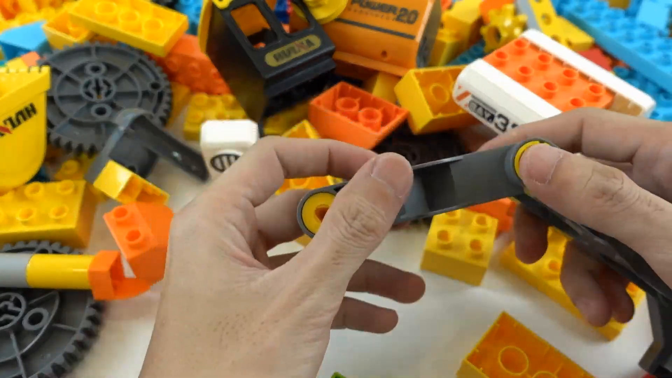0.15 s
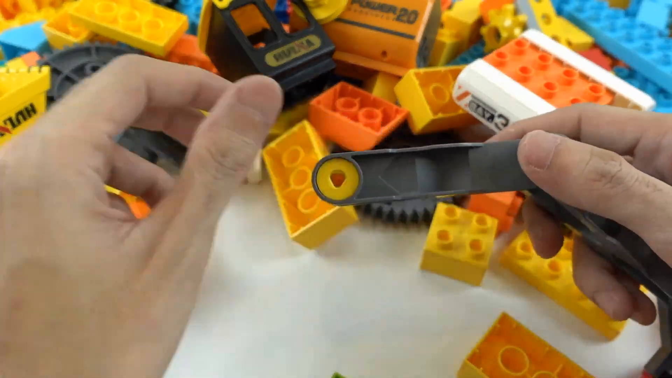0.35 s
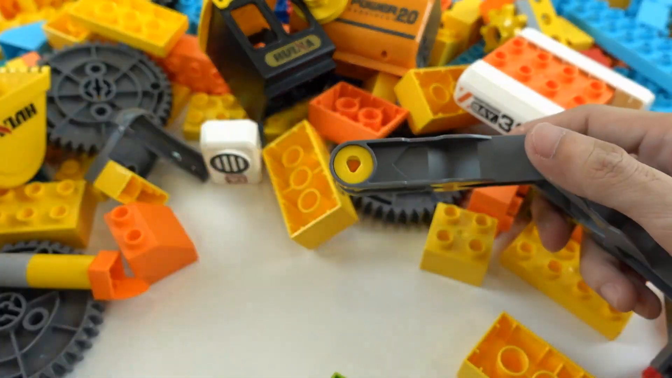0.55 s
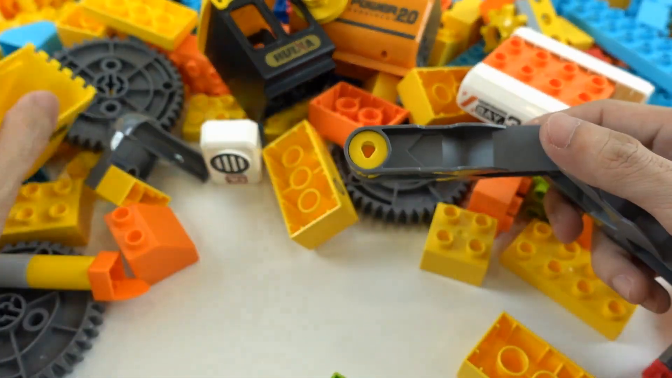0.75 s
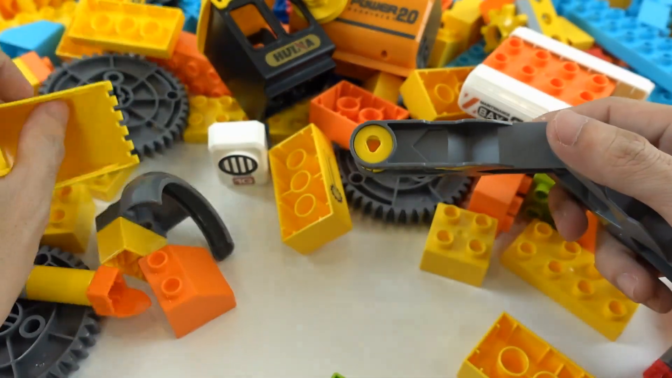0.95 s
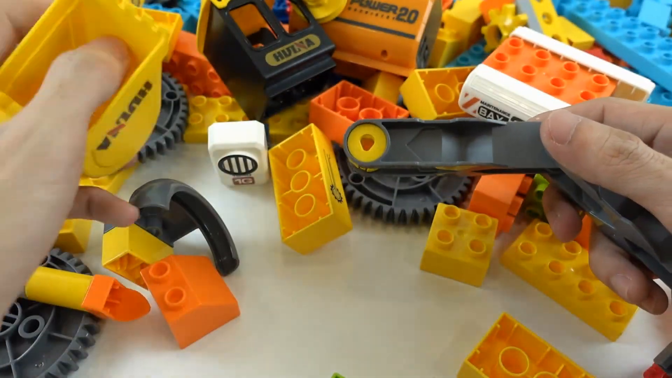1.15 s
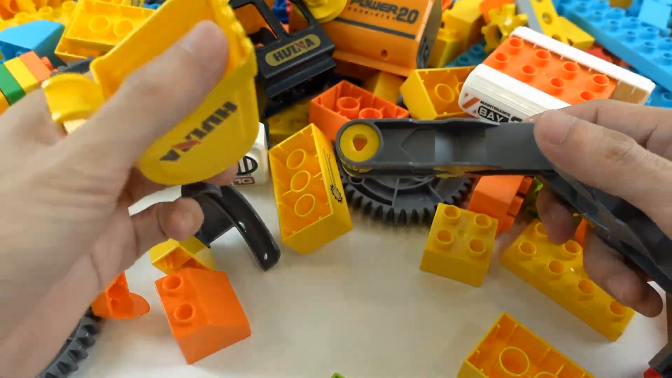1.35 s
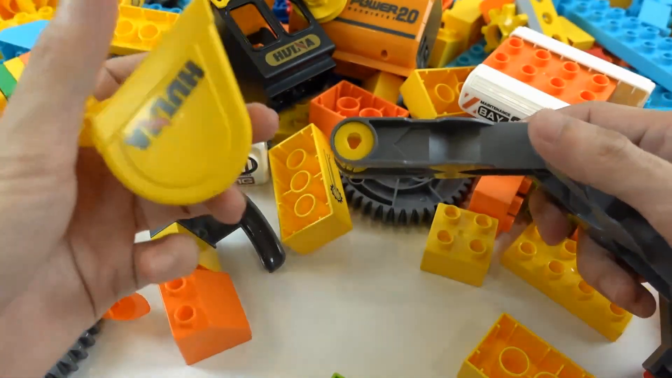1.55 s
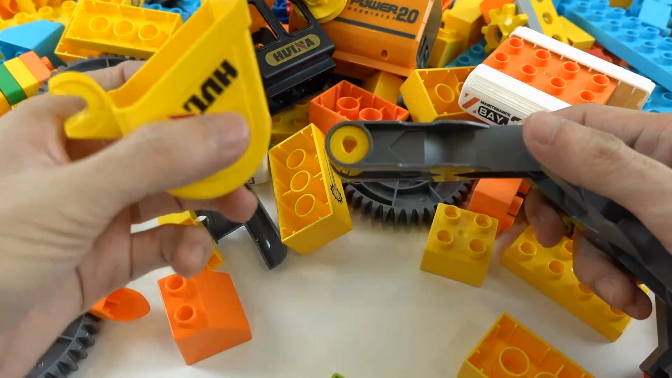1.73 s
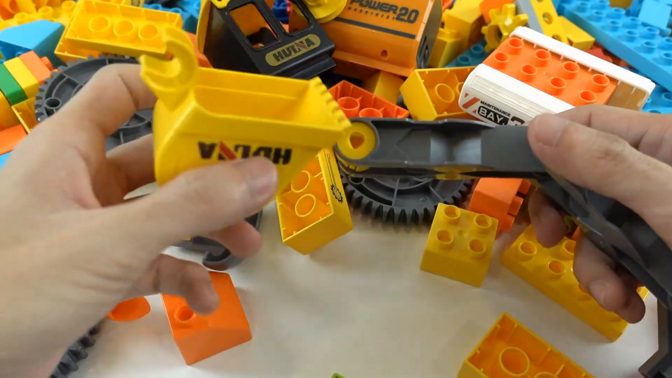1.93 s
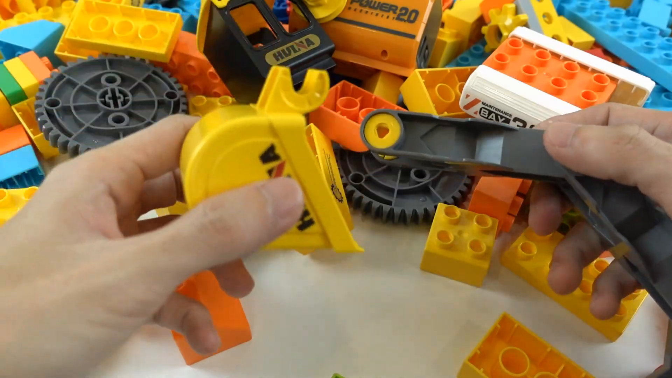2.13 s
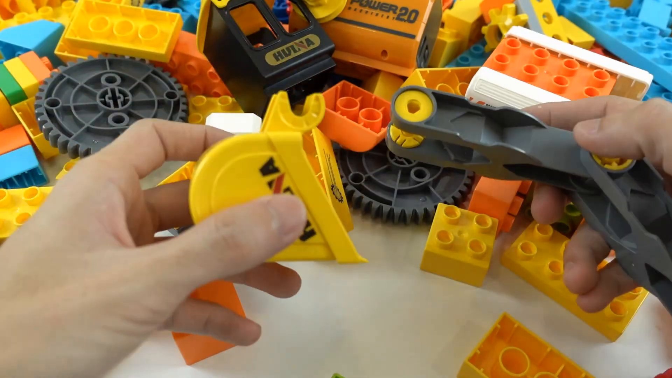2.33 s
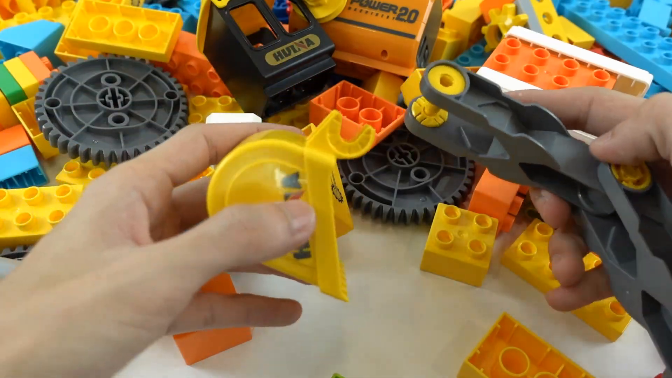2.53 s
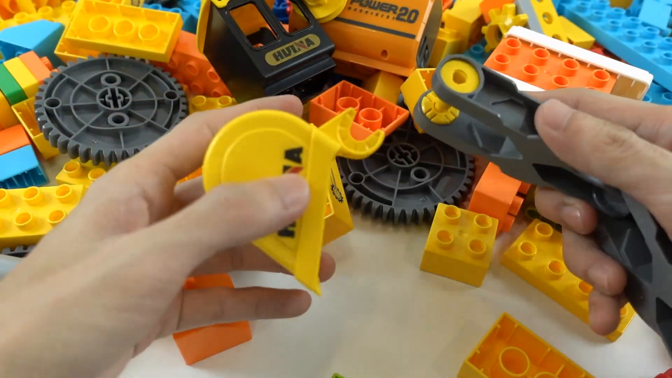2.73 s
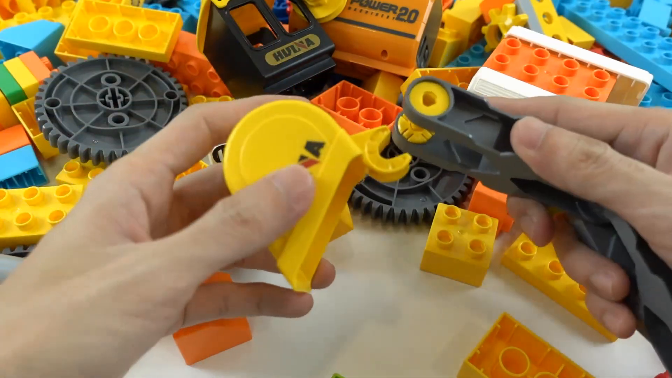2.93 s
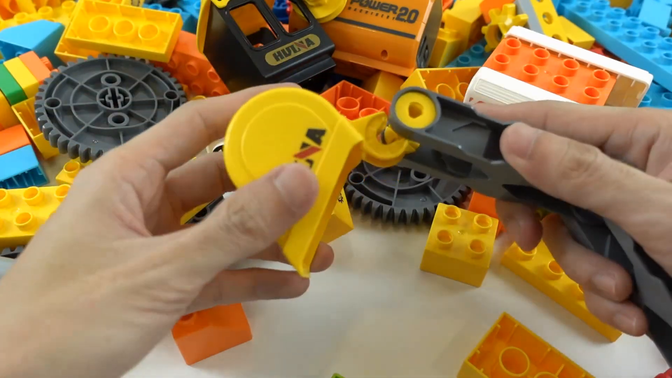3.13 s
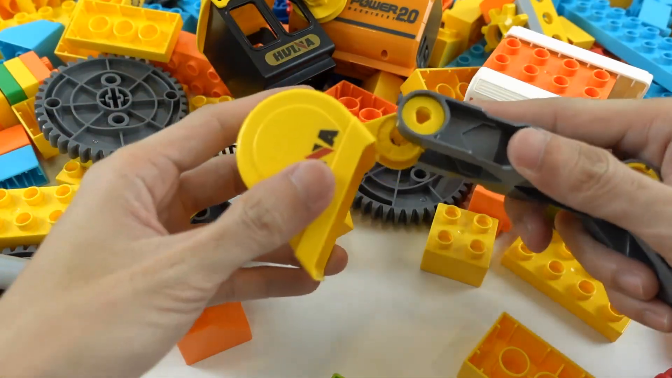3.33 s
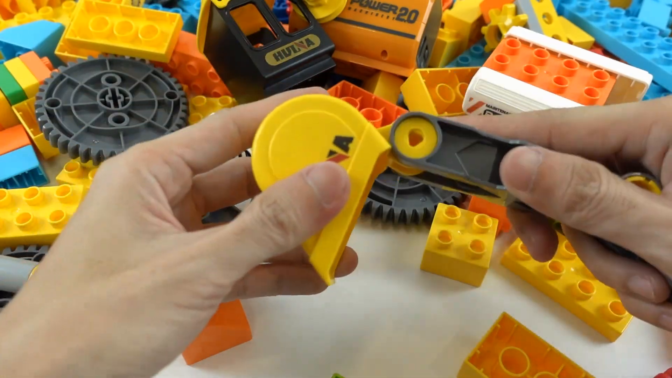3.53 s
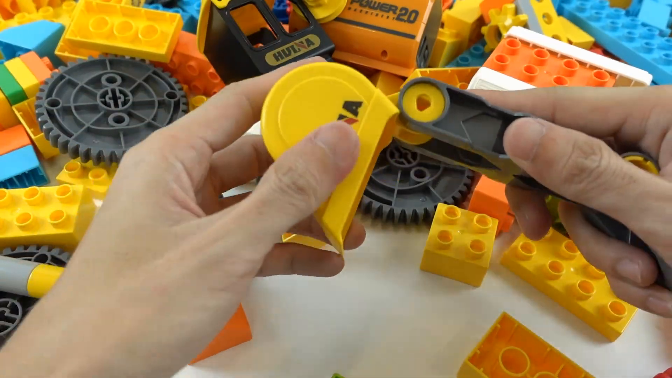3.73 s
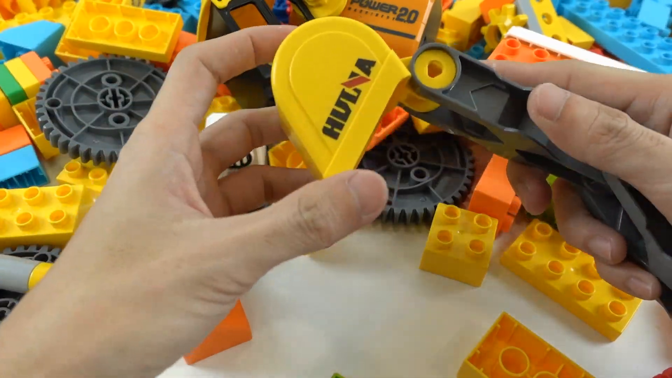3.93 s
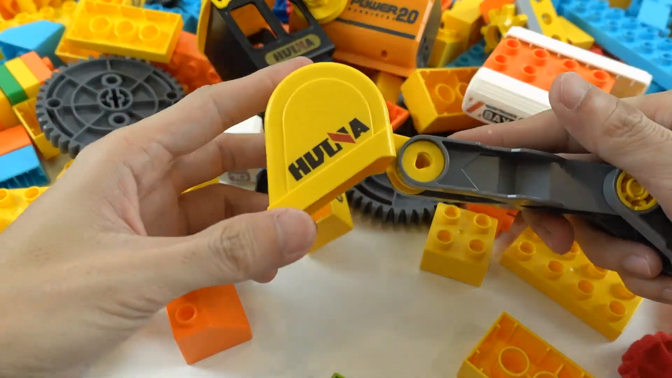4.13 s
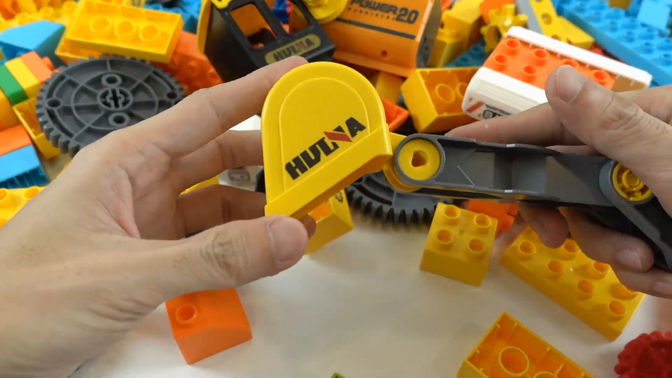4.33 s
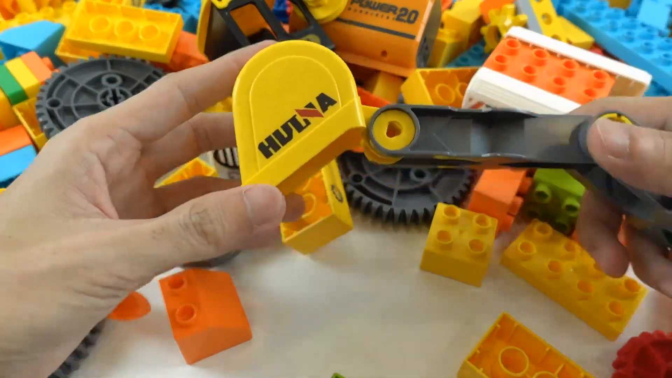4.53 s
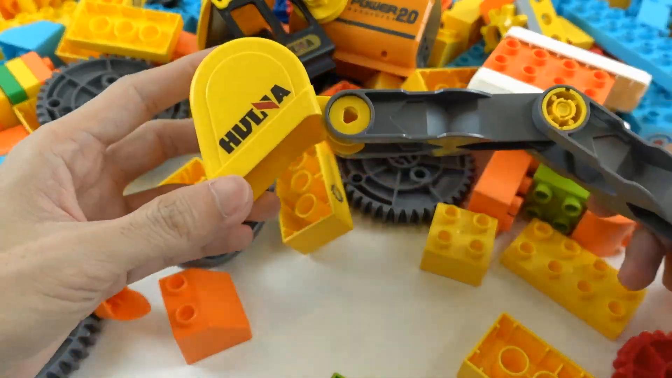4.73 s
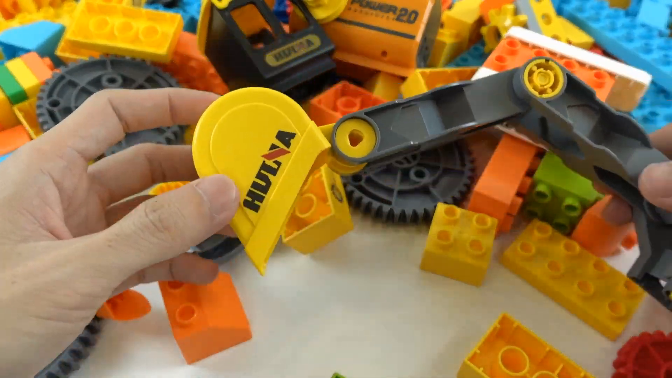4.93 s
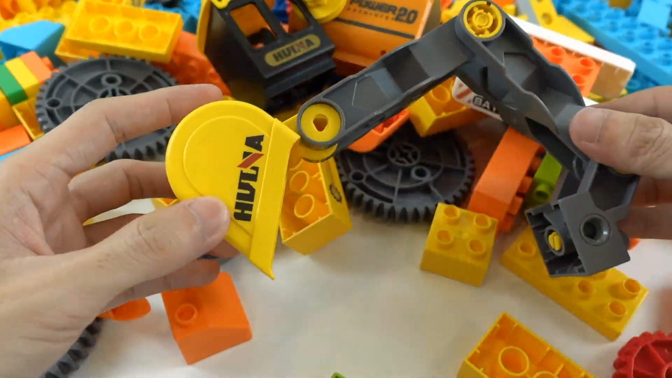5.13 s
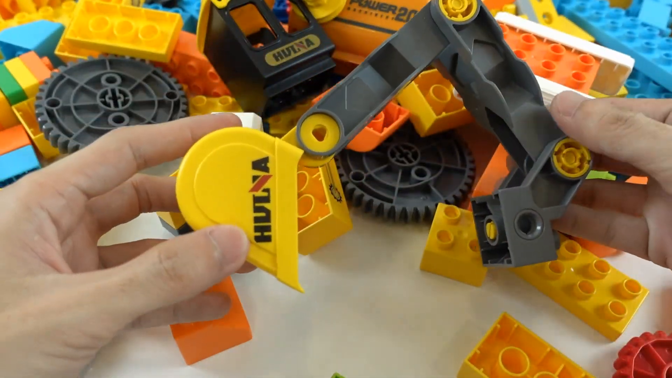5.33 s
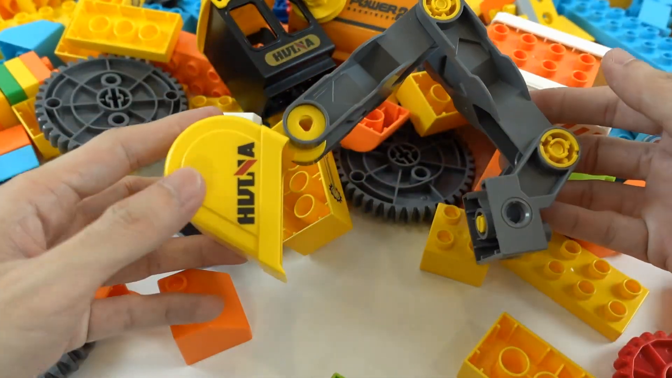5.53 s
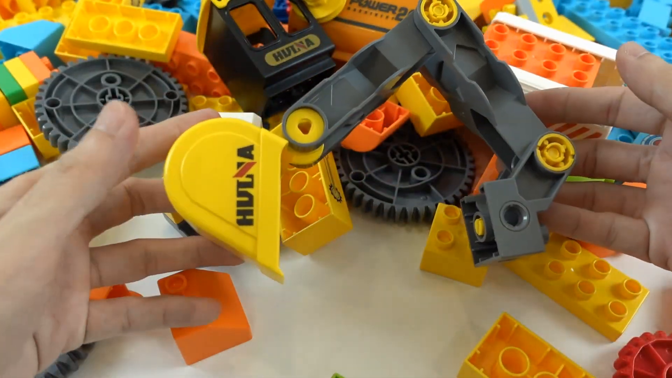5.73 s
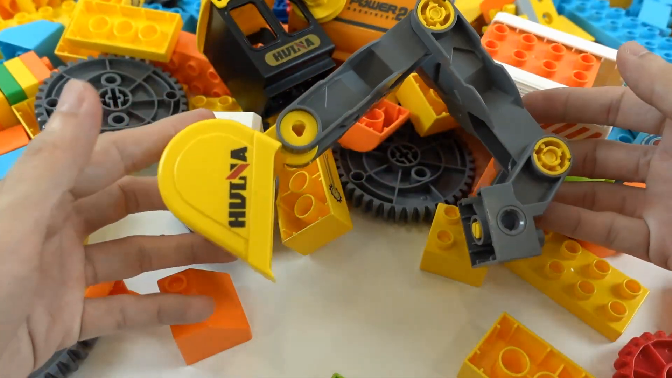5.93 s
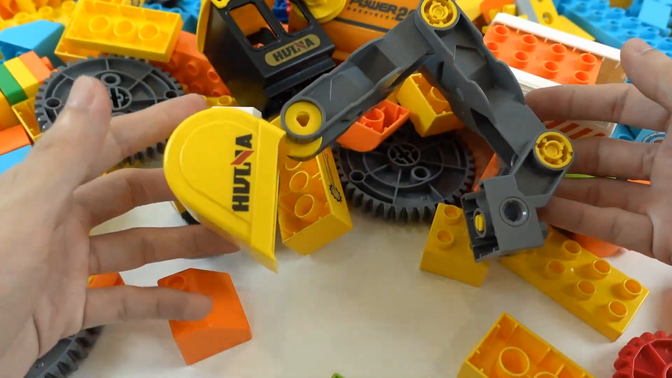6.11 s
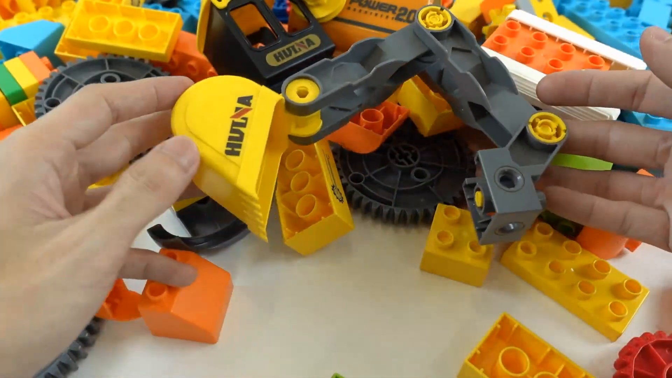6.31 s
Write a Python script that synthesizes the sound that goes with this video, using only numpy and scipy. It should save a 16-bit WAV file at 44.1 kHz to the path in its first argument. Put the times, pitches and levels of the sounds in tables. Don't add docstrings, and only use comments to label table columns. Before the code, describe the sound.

Large hollow plastic toy parts are handled close to two microphones on a table in a bare room with a half-second tail and very faint steady room noise. A small tap comes at 0.3 s and a lighter one at 0.5. From 0.75 to 1.2 s hands dig into the heap: a dense, loud, bright clatter with ringing walls. Short clacks follow at 1.4 and 1.6 s. Around 1.9 to 2.2 s caught blocks drop in a sharp tumble, with dull small knocks at 2.4. It is nearly quiet until light contact taps at 3.2 and a firm knock at 3.4. At 3.6 to 3.75 s a clip grinds home in rapid toothy clicks; hollow knocks follow at 4.05 to 4.3. After a lull, joint clicks at 5.0, a clattering clunk at 5.2, a crisp click at 5.33, soft taps near 6.2 and a final bright rattle at 6.35.

```python
import sys
import numpy as np
from scipy import signal
from scipy.fft import rfft, irfft, next_fast_len
from scipy.io import wavfile
from scipy.ndimage import uniform_filter1d

SR = 44100
rng = np.random.default_rng(int(sys.argv[2]) if len(sys.argv) > 2 else 0)


def digitize_waveform(pressure):
    field = np.atleast_2d(pressure).T
    bounded = np.clip(field, -1, 1)
    quanta = np.round(bounded * 32767).astype(np.int16)
    wavfile.write(sys.argv[1], SR, quanta)


def gain_from_db(level_db):
    decades = np.asarray(level_db, float) / 20
    return 10 ** decades


N = 285327

# pitch_hz, level_db (per Hz)
HUSH_SPECTRUM = [(18, -59), (30, -34.5), (79, -50.5), (115, -9.5), (204, -22.5), (303, -9), (415, -15),
                 (600, -14), (1760, -17.5), (1910, -22), (9220, -23.5), (13700, -27.5), (16000, -25)]
# pitch_hz, t60_s
ROOM_DECAY = [(200, 0.59), (1000, 0.53), (3000, 0.47), (7000, 0.53), (14000, 0.57)]
# pitch_hz, likeness (0 to 1)
LIKENESS = [(100, 0.68), (600, 0.77), (1500, 0.69), (3000, 0.098), (8000, 0.35)]
# pitch_hz, left_minus_right_db
MIC_TILT = [(100, -.5), (1000, -0.3), (4000, -1.5), (14000, -2)]
# pitch_hz, depth_db
GATE_DEPTH = [(60, 30), (150, 33), (680, 29), (900, 60), (8000, 55), (10000, 39), (13000, 33), (15500, 35)]

# pitch_hz, width_hz, level_db
DUG_PARTS = [
    [(317, 29, 4), (4120, 610, -15), (6600, 1100, -21)],
    [(747, 810, -7.5), (1120, 370, 2), (2500, 500, -15), (3700, 300, -5.5), (5800, 600, -22.5)],
    [(800, 470, -13.5), (1420, 140, 4.5), (2420, 240, 9.5), (3600, 200, -11.5), (5300, 280, -8)],
    [(800, 910, -13.5), (1420, 230, 3), (1930, 39, -2), (2600, 640, 3), (3300, 520, -13), (4200, 460, -8.5),
     (5500, 280, -10.5), (6500, 110, -2), (8300, 410, -19.5)],
    [(900, 840, -8), (1500, 320, -5.5), (1930, 80, -2.5), (2800, 610, 2), (3700, 350, -4), (4600, 500, -9),
     (8300, 500, -14)],
    [(800, 2100, -3.5), (1500, 310, -13.5), (2400, 62, -8.5), (3466, 68, 6), (4010, 100, 5), (4620, 52, -1),
     (4860, 70, -11), (6500, 50, 2.5), (9000, 50, 6)],
    [(900, 810, 3.5), (1870, 750, -12.5), (3060, 44, -6.5), (4500, 100, 7.5), (5900, 170, -9)],
]
DROPPED_PARTS = [
    [(875, 390, -14.5), (1410, 340, -6), (2600, 90, 0), (3140, 98, -3), (3950, 53, -3), (4520, 85, 0),
     (7400, 310, -25.5)],
    [(895, 1500, 6.5), (1505, 590, -9), (2460, 74, 6), (2890, 41, 2), (3700, 210, 1), (4800, 130, -12),
     (5750, 75, -14.5), (7000, 230, -16)],
    [(1130, 390, 3.5), (1860, 300, -2), (2900, 170, -10), (4700, 100, -5.5)],
    [(2630, 460, 4.9), (4300, 990, 8), (6190, 310, 6.2)],
]
SNAPPED_PARTS = [
    [(900, 300, -25), (1490, 60, -4), (1650, 70, 0), (2430, 90, -10), (2600, 90, -14), (4800, 700, -26),
     (6900, 900, -30)],
    [(950, 250, -24), (1520, 60, -3), (1620, 70, 0), (2330, 90, -11), (2560, 70, -9), (3490, 300, -17),
     (4910, 500, -21), (6440, 800, -25)],
    [(800, 400, -5), (1150, 200, -1), (1600, 500, -7), (2500, 500, -4), (3600, 500, -5), (4650, 120, -7),
     (6120, 200, -8)],
    [(1500, 90, -3), (1660, 90, 1.5), (2330, 240, -10.5), (1000, 400, -8), (3800, 600, -8),
     (5200, 700, -10)],
]
LAID_PARTS = [
    [(280, 130, 9), (1354, 300, 2), (1980, 730, 4.5), (2900, 570, -2.5), (4420, 300, -7.5)],
    [(486, 150, -16), (1500, 200, 5), (2900, 430, 5), (5200, 500, -1), (7200, 300, 2), (10500, 900, -9)],
    [(755, 420, 1), (1500, 340, -3.5), (4500, 60, 0.5)],
    [(615, 460, -8), (1300, 420, 7), (2200, 160, 1), (3700, 300, -6), (5800, 770, -19)],
    [(767, 590, -7), (1340, 560, 1.5), (2350, 300, 2), (3300, 400, -1), (4700, 180, -1), (6380, 150, -5)],
]
PARTS = DUG_PARTS + DROPPED_PARTS + SNAPPED_PARTS + LAID_PARTS

HANDLING_S = [0, .21, .68, .905, 1.03, 1.33, 1.57, 1.84, 2.08, 2.34, 2.68, 3.18, 3.59, 4.04, 4.95, 5.158,
              5.325, 6.0, 6.17, 6.35]
LOOSE_DB = [-26.5, -8, 8, -6.5, -9, -2, 2, -6.5, 6.5, -8.5, -16.5, -23, -45, 7, -9, -12.5, -12.5, -18, -1.5,
            9]
TOP_HZ = [14050, 8700, 13500, 14500, 14500, 11500, 10100, 13200, 14000, 11000, 12100, 12200, 14800, 9100,
          11400, 10500, 12500, 9000, 8500, 13000]
WALL_DB = [-4, -6, -2, 0, -1, -4, -6, -1, -2, -3, -3, -6, -3, -8, -6, -5, -4, -6, -4, -4]
PAN_DB = [2.5, -3, 3.5, 3, 1.5, 2.2, 1, 0.5, 1, -0.3, -8, -2.7, -2.1, -4, -1.5, -2, 0, 1.5, -0.5, -2.2]
THUD_DB = [-20, -22, -12.5, -14, -14, -12, -12, -15, -16, -16, -33, -36, -46, -15.5, -29.5, -4, -10, -4, -5,
           -6]
CRACK_DB = [-20, -19, -31, -30, -27, -26, -23, -27, -24, -9, -20.5, -23, -29, -30, -11, -25, -13, -8, -14,
            -23]
RATTLE_THUD_DB = [-21.5, -0.5, -9, -11, -11, -4, -4, -4, -6, -6, -60, -36, -46, -6, -28.5, -5, -5, -2, 0,
                  -3]
RATTLE_CRACK_DB = [-3.5, -20, -11.5, -7.5, -5.5, -1.5, -4, -3, -14, -12, -6, 0, 4.5, -9, -5, -16, -8, -18,
                   -8, -10.5]

# full_s, level_db, hold_s, settling_db_per_s
STIRS = [(0.0, -43.5, 0.013, 76), (0.221, -62, 0.09, 219.5), (0.299, -24.5, 0.0013, 189),
         (0.522, -52.5, 0.006, 54), (0.748, -23, .005, 83), (0.855, -22, 0.0054, 261),
         (0.914, -38, 0.022, 197), (1.355, -22, 0.025, 500), (1.422, -37, 0.0039, 230),
         (1.605, -31.5, 0.0086, 174), (1.92, -24, 0.015, 51), (2.071, -26, 0.008, 198),
         (2.353, -35.5, 0.078, 150), (2.801, -40.5, 0.0037, 487.5), (3.291, -51, 0.15, 200),
         (3.402, -35.5, 0.004, 198), (3.436, -34, .01, 110), (3.629, -23, 0.083, 151),
         (4.047, -26.5, 0.0051, 188), (4.17, -23, 0.03, 135), (4.242, -27, 0.0025, 144),
         (5.028, -47.5, 0.0033, 798), (5.262, -34, 0.0062, 208), (5.312, -44, 0.0088, 130),
         (5.99, -51.5, 0.0031, 166), (5.333, -43, 0.0041, 154), (6.184, -35.5, .04, 120),
         (6.348, -17.5, 0.0094, 162)]
# full_s, level_db, hold_s, settling_db_per_s
SHOVES = [(0.93, -17, 0.17, 186.5), (1.896, -40, 0.006, 203.5), (2.148, -19, 0.0042, 138.5),
          (2.726, -49.5, 0.041, 220), (3.618, -25, 0.0087, 201.5), (0.745, -44.5, 0.0047, 197.5),
          (1.348, -28, .005, 202.5), (5.014, -43.5, 0.0046, 203), (0.295, -38.5, .005, 201),
          (4.565, -58, 0.16, 98.5), (4.779, -55, 0.019, 247), (5.188, -18, 0.027, 255),
          (6.317, -34, .04, 121)]
# start_s, peak_db, pitch_hz, t60_s
PINGS = [(0.335, -29, 3720, .05), (0.672, -54, 3000, .25), (0.952, -20, 6500, .05), (1.366, -24, 6570, .06),
         (1.415, -16, 4820, .03), (1.421, -22, 2470, .08), (1.641, -33, 5850, .04), (1.655, -34, 4500, .07),
         (4.081, -24, 4800, .035), (4.104, -33, 6500, .06), (4.192, -22, 6100, .035),
         (4.267, -20, 4680, .045), (5.204, -14, 3050, .05), (6.375, -21, 6350, .08)]
# start_s, peak_db, pitch_hz (of the struck wall)
DIGGING = [(0.312, -23, 1110), (0.531, -29, 1010), (0.764, -14.5, 1400), (0.792, -23, 1420),
           (0.816, -19.5, 1310), (0.847, -11.5, 2520), (0.852, -9.5, 1390), (0.857, -17, 800),
           (0.889, -15.5, 1410), (0.914, -7.5, 1420), (0.929, -11, 3370), (0.929, -15.5, 735),
           (0.940, -6, 1400), (0.987, -16, 4400), (0.937, -12, 4440), (0.945, -6.5, 4700),
           (0.951, -16, 4100), (0.993, -4, 3300), (1.007, -13, 3300), (1.018, -17.5, 2700),
           (0.956, -4.5, 4100), (0.963, -11, 1420), (0.972, -5.5, 4100), (0.968, -6, 2500),
           (0.983, -6.5, 2400), (0.986, -6, 2800), (0.999, -4, 3240), (1.024, -7, 2630), (1.028, -6, 2800),
           (1.046, -14.5, 3740), (1.052, 1, 3700), (1.059, -11, 2900), (1.137, -12.5, 3000),
           (1.072, -10.5, 3000), (1.081, -6, 1880), (1.119, -12.5, 1980), (1.127, -8.5, 2040),
           (1.187, -19, 1930), (1.356, -16, 4800), (1.366, -11.5, 4520), (1.416, -12.5, 4010),
           (1.421, -27.5, 2510), (1.598, -33, 800), (1.604, -24.5, 3060), (1.611, -20.5, 2960),
           (1.633, -28, 900), (1.642, -30.5, 4500)]
# start_s, peak_db, pitch_hz
DROPPING = [(1.891, -36, 960), (1.917, -8, 2960), (1.941, -19.5, 3100), (2.051, -27, 3120),
            (2.059, -15, 4480), (2.09, -12.5, 5750), (2.102, -13.5, 1330), (2.127, -11.5, 1500),
            (2.131, -11, 1420), (2.133, -8.5, 4600), (2.17, -14, 5000), (2.153, -11.5, 2890),
            (2.188, -10.5, 1590), (2.399, -25.5, 1130), (2.424, -29.5, 1740), (2.446, -29, 1160),
            (2.465, -25.5, 1920)]
# start_s, peak_db, pitch_hz
SNAPPING = [(3.196, -25, 2500), (3.285, -16.5, 2420), (3.407, -20.5, 1550), (3.424, -9, 2530),
            (3.427, -10.5, 1780), (3.431, -14.5, 1640), (3.496, -35, 4900), (3.475, -22, 1620),
            (3.921, -29.5, 2230), (3.953, -36, 1650), (3.985, -32, 3990), (4.094, -20, 5900),
            (4.169, -10, 2600), (4.19, -11, 3360), (4.206, -13, 1250), (4.22, -13, 3700),
            (4.303, -17, 1200)]
# start_s, peak_db, pitch_hz
LAYING = [(4.973, -37.5, 2270), (5.172, -13.5, 3070), (5.176, -18, 1500), (5.183, -12, 2140),
          (5.192, -13, 2640), (5.204, -17, 2900), (5.211, -14.5, 3220), (5.217, -17, 2900),
          (5.254, -16.5, 2900), (5.248, -24, 2780), (5.426, -26.5, 650), (5.433, -35, 3000),
          (5.439, -34, 2900), (6.182, -34.5, 700), (6.204, -23, 1220), (6.246, -34, 1300),
          (6.221, -22.5, 2270), (6.269, -25.5, 1280), (6.318, -30, 2250), (6.362, -12.5, 1340),
          (6.446, -27, 5500), (6.466, -18, 2300)]
# start_s, peak_db, pitch_hz
FURTHER_KNOCKS = [(0.302, -10, 1110), (0.761, -13, 2550), (1.363, -12, 2500), (2.088, -14, 1300), (2.097, -9, 2500),
                  (2.112, -7, 1460), (2.372, -22, 1110), (3.226, -23, 2590), (4.056, -16, 2400), (4.081, -16, 1600),
                  (4.163, -10, 3640), (4.266, -8, 3000), (5.2, -10, 3000), (6.029, -35, 750), (6.033, -38, 1600),
                  (6.36, -12, 3300), (5.337, -21, 1500), (6.397, -9, 2340), (6.416, -11, 2720)]
# start_s, peak_db, pitch_hz
CLICKS = [(0.229, -32.5, 3600), (0.233, -28, 4260), (1.854, -37, 4270), (2.734, -38, 3230),
          (2.841, -30, 4230), (4.829, -37, 4200), (5.034, -21, 1650), (5.332, -13.5, 7200),
          (5.334, -21.5, 2900), (5.34, -16, 5200), (5.601, -37.5, 5900), (6.029, -44, 4500),
          (5.038, -19.5, 3920)]
GRINDING = [(3.630, -9, 2200), (3.636, -8, 2550), (3.648, -14, 1600), (3.663, -10, 1520),
            (3.674, -10, 1620), (3.684, -9.5, 1600), (3.690, -13, 1580), (3.698, -10, 1560),
            (3.711, -11, 1600), (3.721, -14, 1560), (3.750, -15, 1620), (3.829, -25, 1510)]
KNOCKS = DIGGING + DROPPING + SNAPPING + LAYING + FURTHER_KNOCKS + CLICKS

BRIGHTER_PER_DB = 2.36
EDGE_HZ = 15900


def evened(x):
    return x / np.sqrt(np.mean(x ** 2) + 1e-20)


def peaked(x):
    return x / abs(x).max()


def read(points, hz):
    f, value = np.transpose(points)
    return np.interp(np.log(hz + 1), np.log(f + 1), value)


def add(mix, start_s, sound):
    part = mix[:, round(start_s * SR):][:, :sound.shape[1]]
    part += sound[:, :part.shape[1]]


def panned(sound, pan_db):
    return sound * gain_from_db([[pan_db / 2], [-pan_db / 2]])


def band(x, lo_hz, hi_hz, order=2):
    edges = [lo_hz, min(hi_hz, .45 * SR)]
    return signal.sosfilt(signal.butter(order, edges, "bandpass", fs=SR, output="sos"), x)


def ring(x, hz, width):
    r = np.exp(-np.pi * 1.5 * width / SR)
    b = [1 - r, 0, r - 1]
    a = [1, -2 * r * np.cos(2 * np.pi * hz / SR), r * r]
    return signal.lfilter(b, a, signal.lfilter(b, a, x))


def body(x, modes, shell_db):
    top = max(db for *_, db in modes)
    rings = sum(gain_from_db(db - top) * ring(x, hz, np.clip(1.2 * width, 50, 900)) for hz, width, db in modes)
    return rings + gain_from_db(shell_db) * band(x, 1000, 3300)


def paired(z, hz):
    same = np.clip(read(LIKENESS, hz), 0, 1)[:, None]
    return np.array([z[0], same * z[0] + np.sqrt(1 - same ** 2) * z[1]])


def hush():
    frames, hz = N // 256 + 5, np.fft.rfftfreq(1024, 1 / SR)
    a, b, c, d, patches = rng.standard_normal((frames, 513, 5)).T
    patches = evened(uniform_filter1d(uniform_filter1d(patches, 10, 0), 16, 1))
    shape_db = read(HUSH_SPECTRUM, hz)[:, None] + 1.8 * patches
    z = paired([a + 1j * b, c + 1j * d], hz) * gain_from_db(shape_db)
    return gain_from_db(-59) * evened(signal.istft(z, nperseg=1024, noverlap=768)[1][:, :N])


def room(x):
    out, turn = np.zeros((2, N)), np.arange(N) / SR * 7 * np.pi
    tail_db, early_db = -1.5, -9
    for k in range(3):
        hz, t, z = signal.stft(rng.standard_normal((2, SR * 3 // 4)), SR, nperseg=256)
        decay = gain_from_db(-60 * t / read(ROOM_DECAY, hz)[:, None])
        onset = np.clip((t - .004) / 0.0064, 0, 1)
        tail = signal.istft(paired(z, hz) * decay * onset, SR, nperseg=256)[1]
        tail *= gain_from_db(tail_db) / np.linalg.norm(tail[0])
        at = rng.integers(40, 500, 6) + rng.integers(0, 7, (2, 6))
        np.put_along_axis(tail, at, gain_from_db(early_db) * np.exp(-at / 630.0), 1)
        window = np.sqrt(2 / 3) * np.cos(turn + k * np.pi / 3)
        out += signal.fftconvolve((x * abs(window))[None], tail, axes=1)[:, :N]
    return out


def table_hum(blocks):
    t60_s = 0.78
    return gain_from_db(20) * ring(blocks, 253.3, 2.57 / t60_s)


def stirring(t):
    s, level_db, hold, settle = (c[:, None] for c in np.transpose(STIRS + SHOVES))
    knock_s, count = np.append(0, np.transpose(KNOCKS + GRINDING)[0]), len(STIRS)
    nearest = abs(s[:count] - knock_s).argmin(1)
    s = np.append(knock_s[nearest], s[count:])[:, None]
    swell = np.repeat([6000, 703], [count, len(SHOVES)])[:, None]
    shape_db = level_db - swell * np.maximum(s - t, 0) - settle * np.maximum(t - s - hold, 0)
    fingers_db = -83
    return 10 * np.log10((gain_from_db(np.maximum(shape_db, -200)) ** 2).sum(0) + gain_from_db(fingers_db) ** 2)


def rattle(modes, loose_db, top_hz, start, end, thud_db, crack_db):
    t = np.arange(start, end, 1 / SR)
    level_db = np.interp(t, t[::32], stirring(t[::32]))
    ticks_per_s, tick_spread_db, scrape_s, trim_db = 900, 3.0, .0008, -4.5
    chance, size, jitter = rng.random(len(t)), rng.exponential(1, len(t)), rng.standard_normal(len(t))
    ticks = (chance < ticks_per_s / SR) * gain_from_db(tick_spread_db * np.minimum(size, 2.4))
    drive = jitter * signal.lfilter([1], [1, -np.exp(-1 / (scrape_s * SR))], ticks + .006)
    lag = np.repeat(rng.integers(-3, 3, len(t) // 256 + 1), 256)[:len(t)]
    drive = np.array([drive[np.clip(np.arange(len(t)) - lag, 0, len(t) - 1)], drive])
    thud = gain_from_db(thud_db) * evened(band(drive, 280, 1200, order=3))
    fizz = np.tanh(.7 * evened(drive))
    brightness_db = crack_db + BRIGHTER_PER_DB * (level_db - level_db.max())
    crack = gain_from_db(brightness_db) * evened(band(fizz, 4400, top_hz))
    which = np.repeat(rng.integers(0, 28, len(t) // 128 + 1), 128)[:len(t)]
    pitches = np.geomspace(750, 6000, 28) * rng.uniform(0.97, 1.03, 28)
    loose = sum(ring(drive * (which == k), hz, 310) for k, hz in enumerate(pitches))
    tone = evened(body(drive, modes, loose_db - 4) + gain_from_db(loose_db + 4.5) * loose)
    sound = band(tone + thud + crack, 210, top_hz)
    return start + .004, gain_from_db(level_db + trim_db) * sound * signal.windows.tukey(len(t), .02)


def ping(start_s, peak_db, hz, t60):
    t = np.arange(0, t60, 1 / SR)
    beat_hz, turn = rng.uniform(30, 70), rng.uniform(0, 2 * np.pi)
    pair = np.sin(2 * np.pi * hz * t) + .4 * np.sin(2 * np.pi * (hz + beat_hz) * t + turn)
    sound = gain_from_db(peak_db - 60 * t / t60) * np.minimum(t / .001, 1) * pair
    return start_s, np.array([sound, np.roll(sound, rng.integers(-2, 3))])


def knock(modes, wall_db, loose_db, top_hz, start_s, peak_db, hz, thud_db, crack_db):
    t = np.arange(2048) / SR
    chatter = 0.54 * rng.standard_normal(len(t)) * np.exp(-t / 0.0008)
    contact = chatter + np.exp(-t / .00006)
    splinters = .5 * rng.standard_normal(len(t)) * np.exp(-t / .003)
    wall = gain_from_db(wall_db) * peaked(ring(contact, hz, 115 + .04 * hz))
    tone = peaked(wall + peaked(body(contact, modes, loose_db - 8)))
    thud = gain_from_db(thud_db + 1) * peaked(band(contact, 260, 1150, order=3))
    edges = band(.4 * contact + splinters * np.minimum(t / .0006, 1), 3000, top_hz)
    crack = gain_from_db(crack_db + 7) * peaked(band(edges, 1000, 5000, order=1))
    sound = gain_from_db(peak_db - .5) * peaked(band(tone + thud + crack, 180, top_hz))
    lag = rng.integers(0, 6)
    return start_s, np.array([np.roll(sound, lag), np.roll(sound, 2)])


def struck(k, event):
    start_s, peak_db, hz = event
    hardest_db, brightest_db = -6, -14
    thud_db = THUD_DB[k] - 5 * np.log2(hz / 2000)
    crack_db = CRACK_DB[k]
    if event in CLICKS:
        crack_db += 7
    else:
        crack_db += BRIGHTER_PER_DB * (min(peak_db, brightest_db) + 19.0)
    return knock(PARTS[k], WALL_DB[k], LOOSE_DB[k], TOP_HZ[k], start_s, min(peak_db, hardest_db), hz,
                 thud_db, crack_db)


def scene():
    blocks, ends = np.zeros((2, N)), HANDLING_S[1:] + [N / SR]
    for k, span in enumerate(zip(HANDLING_S, ends)):
        s, sound = rattle(PARTS[k], LOOSE_DB[k], TOP_HZ[k], *span, RATTLE_THUD_DB[k], RATTLE_CRACK_DB[k])
        add(blocks, s, panned(sound, PAN_DB[k]))
    for event in KNOCKS + GRINDING:
        k = np.searchsorted(HANDLING_S, event[0]) - 1
        s, sound = struck(k, event)
        add(blocks, s, panned(sound, PAN_DB[k]))
    near = blocks + table_hum(blocks) + room(blocks.mean(0))
    for row in PINGS:
        add(near, *ping(*row))
    clatter = band(near, 564, 28000)
    boom = gain_from_db(-10) * band(near, 200, 239.6, order=3)
    return band(clatter + boom + hush(), 20, EDGE_HZ, order=8)


def gated(x):
    hz, t, z = signal.stft(x, SR, nperseg=2048)
    power_db = 10 * np.log10(uniform_filter1d(abs(z) ** 2, 9, 1) + 1e-20)
    depth_db = power_db.max(1, keepdims=True) - power_db - read(GATE_DEPTH, hz)[:, None]
    return signal.istft(z * np.clip(.5 - depth_db / 3, 0, 1), SR, nperseg=2048)[1][:, :N]


def band_limit(x):
    return signal.sosfilt(signal.butter(12, 16490, fs=SR, output="sos"), x)


def record(dry):
    ceiling = .75
    rounded = ceiling * np.tanh(dry / ceiling)
    size = next_fast_len(N)
    hz = np.fft.rfftfreq(size, 1 / SR)
    tilt = gain_from_db(np.outer([.5, -.5], read(MIC_TILT, hz))) * np.where(hz < EDGE_HZ, 1, gain_from_db(-40))
    mix = gated(irfft(rfft(rounded, size) * tilt, size)[:, :N])
    return band_limit(mix)


dry = scene()
out = record(dry)
digitize_waveform(out)
```